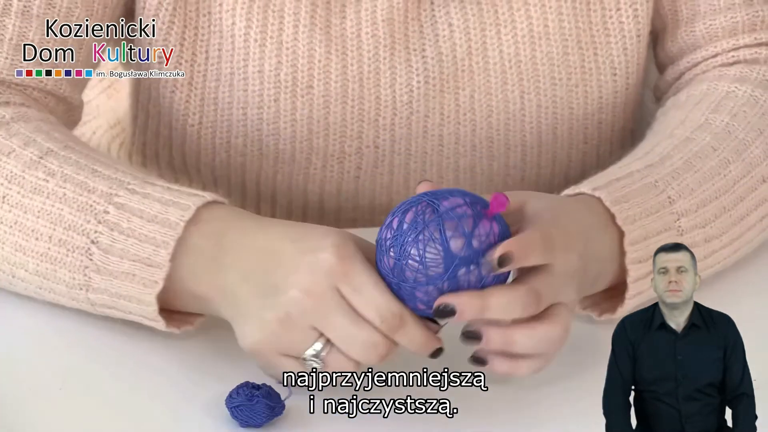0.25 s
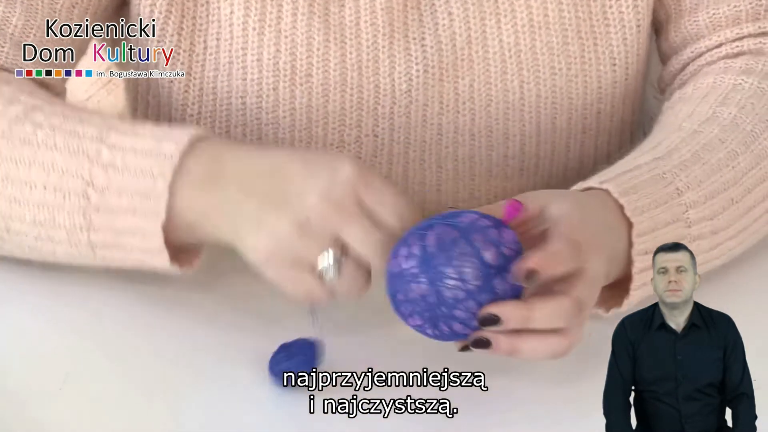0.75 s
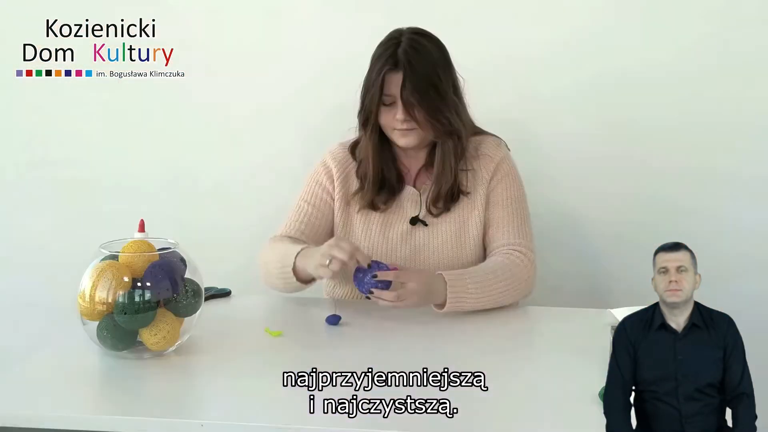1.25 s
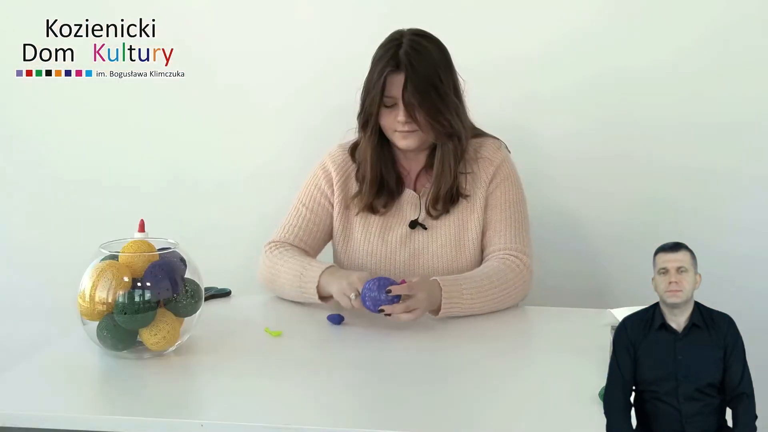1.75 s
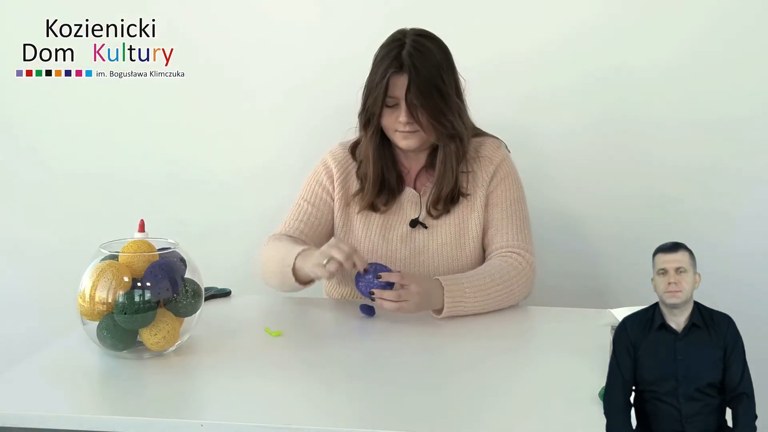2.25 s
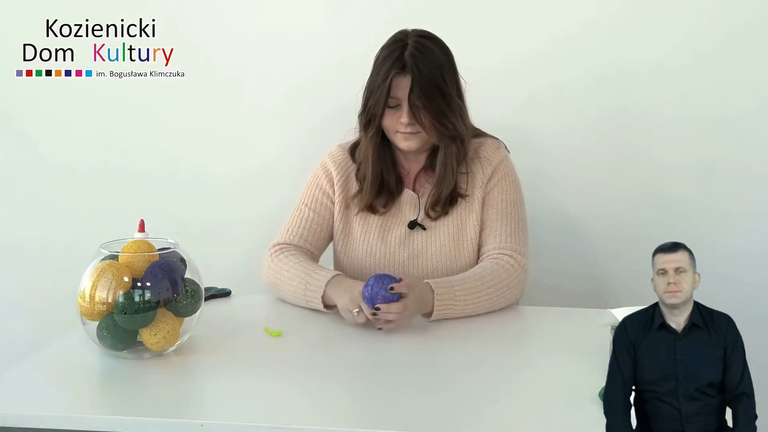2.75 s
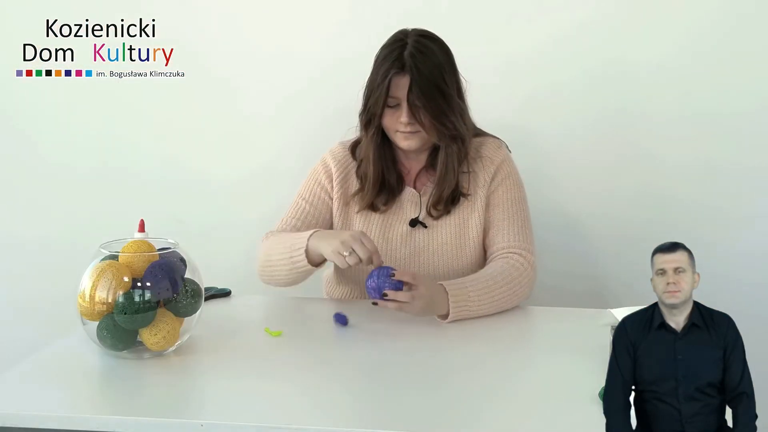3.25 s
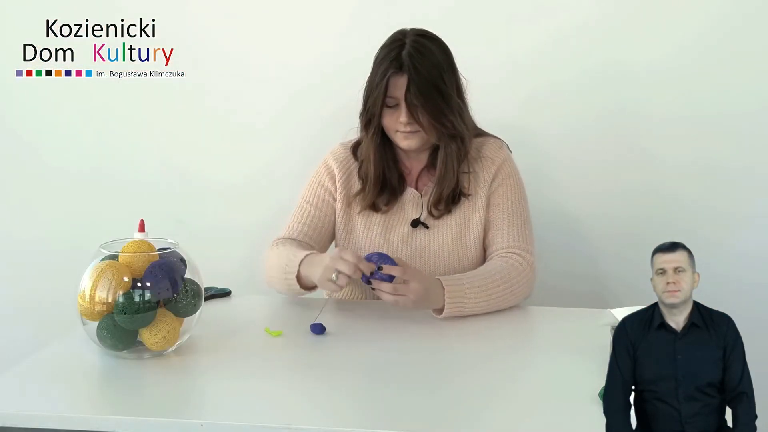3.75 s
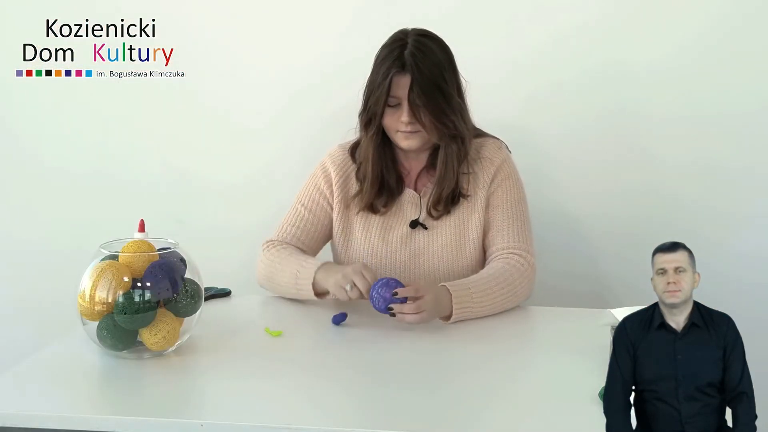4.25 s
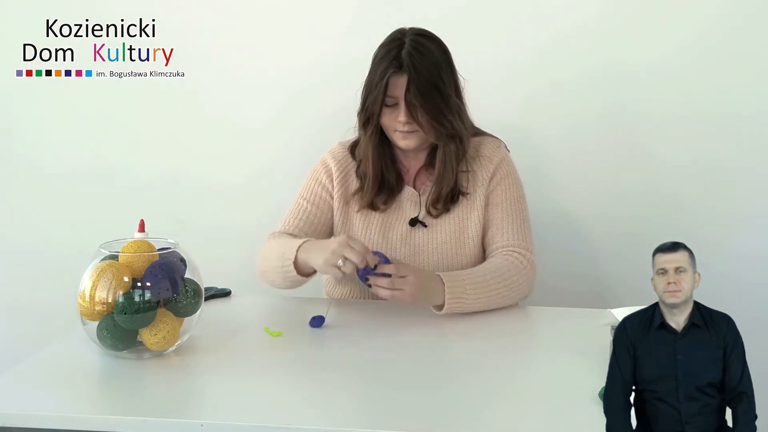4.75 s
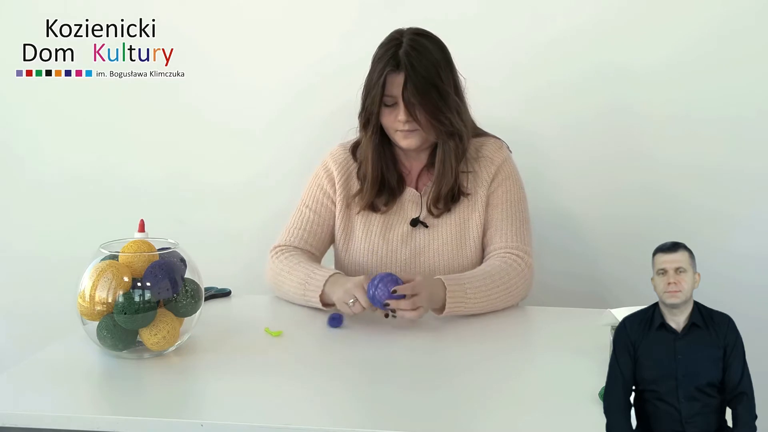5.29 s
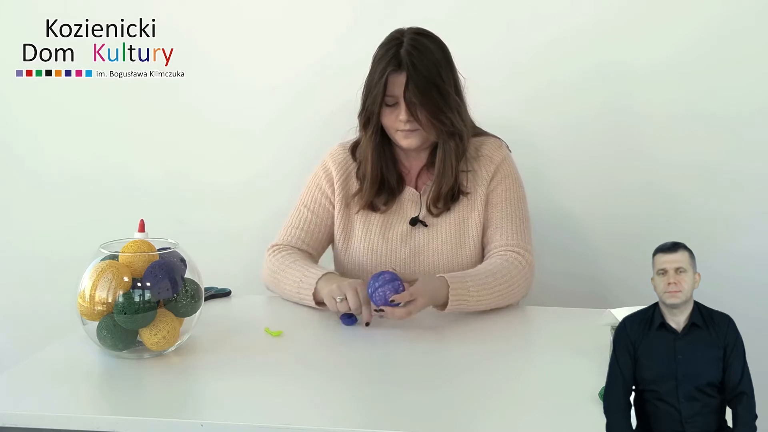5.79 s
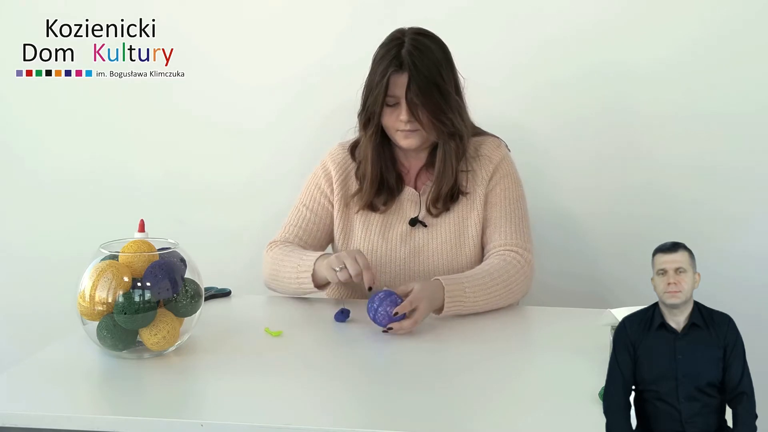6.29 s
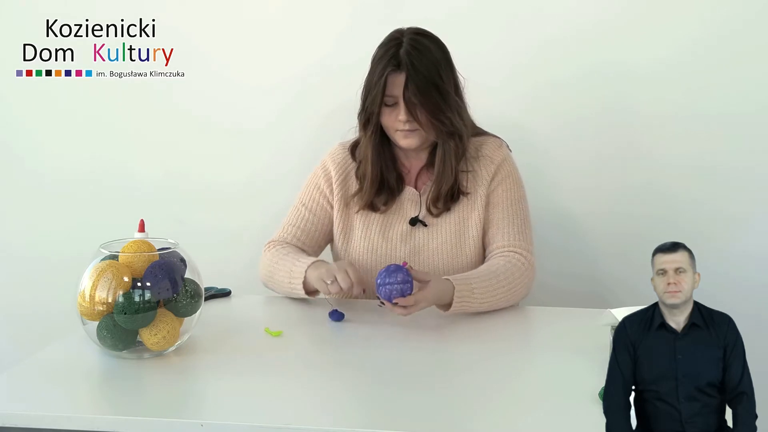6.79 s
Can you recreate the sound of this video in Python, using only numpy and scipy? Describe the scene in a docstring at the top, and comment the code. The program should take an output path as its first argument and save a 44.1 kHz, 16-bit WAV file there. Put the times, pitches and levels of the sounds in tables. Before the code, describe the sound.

Thread being wound by hand round a taut balloon: short uneven scratchy hisses, dull rubber booms and sharp little snaps, close in a quiet room.

```python
"""Quiet room, close clip-on microphone: thread is wound by hand round a small taut balloon.
Uneven strokes of thread and fingertips hiss (noise of moving colour) and fibres tick over the windings.
The rubbed balloon booms and rustles (noise through its resonances); strands slip and snap on the rubber
(crack, ring, falling ripple, thump). A noise suppressor darkens the quiet moments over a faint floor."""
import sys
import numpy as np
from scipy import signal
from scipy.fft import rfft, irfft, next_fast_len
from scipy.io import wavfile
from scipy.ndimage import uniform_filter1d

SR = 44100
rng = np.random.default_rng(int(sys.argv[2]) if len(sys.argv) > 2 else 0)


def file_out(sig):
    """Save sig as 16-bit WAV at sys.argv[1]."""
    # one column per channel
    cols = np.atleast_2d(sig).T
    # limit, then scale
    lim = np.clip(cols, -1, 1)
    pcm = np.round(lim * 32767).astype(np.int16)
    wavfile.write(sys.argv[1], SR, pcm)


N = 310023

# room rumble and hiss, relative spectrum: (frequency [Hz], density [dB per Hz])
ROOM_SPECTRUM = [(20, -3.5), (45, 0), (70, -8.5), (130, -14.5), (300, -21.5), (700, -24.5), (1500, -25),
                 (2800, -29.5), (4000, -35.5), (15000, -34)]
# suppressor shuts a band below this power: (frequency [Hz], density [dB per Hz])
SUPPRESSOR_THRESHOLD = [(150, -108), (400, -108), (620, -100), (1000, -103), (1400, -105), (1700, -102),
                        (2300, -106), (2600, -94), (2950, -86), (3200, -114), (5000, -130), (13500, -128),
                        (15000, -112)]
# balloon resonances in three families: (centre [Hz], half-width at 1/e amplitude [Hz], relative level [dB])
BOOM_MODES = [(207.5, 16, -20), (262.5, 22.8, 4.5), (332.8, 28, -0.5), (381, 48, 0.5), (429.6, 18.3, 1),
              (347, 141, -5)]
LOW_SKIN_MODES = [(734.5, 25, -1.5), (773, 69, -12), (1038, 91, 0), (920, 290, -7)]
HIGH_SKIN_MODES = [(1223, 37.7, -2), (1386, 54, -12.5), (1432, 117, -5), (1622, 55, -17), (1875, 110, -7),
                   (2066, 55, -4.5), (2296, 80, 3), (2396, 150, -8.5), (2780, 630, 2)]
# turns of thread or fresh grips:
# (start [s], skin pitch favoured at first [Hz], time constant of the climb [s])
TURNS_OR_GRIPS = [(0, 797, 0.32), (.4, 1440, 3.0), (.68, 1100, 0.51), (1.148, 590, 0.92), (2.22, 790, 0.87),
                  (3.0, 1163, 0.36), (3.581, 650, 2), (3.8, 1390, 2.7), (4.62, 1510, 3.0),
                  (5.15, 1240, 1.3), (5.36, 1110, 0.51), (6.599, 1420, 1.4)]
# pulls pressing the thread into the balloon: (tightest moment [s], tightening [s], slackening [s],
# boom level [dB], low skin level [dB])
THREAD_PULLS = [(0.048, 0.18, 0.13, -54, -68), (0.14, 0.07, 0.21, -56.5, -66),
                (0.384, 0.025, 0.29, -69, -84), (0.634, 0.02, 0.07, -60, -65),
                (0.715, 0.043, 0.19, -51.5, -52), (0.89, 0.084, 0.11, -63, -78),
                (1.167, 0.042, 0.202, -51.5, -75), (1.364, 0.13, 0.14, -37, -51.5),
                (1.45, 0.072, 0.2, -50.5, -47), (1.635, 0.052, 0.106, -53.5, -50.5),
                (1.792, 0.025, 0.079, -52, -52), (1.89, 0.11, 0.11, -52, -67.5),
                (2.314, 0.16, 0.4, -41.5, -59), (2.494, 0.29, 0.26, -69.5, -61),
                (2.692, 0.056, 0.12, -61, -53), (3.123, 0.12, 0.095, -64.5, -63.5),
                (3.487, 0.14, 0.059, -52, -86.5), (3.69, 0.11, 0.34, -45, -61.5),
                (3.841, 0.081, 0.22, -55, -56.5), (4.21, 0.14, 0.072, -59.5, -70),
                (4.33, 0.21, 0.23, -58.5, -79), (4.697, 0.06, 0.37, -47.5, -59),
                (4.92, 0.13, 0.26, -49, -62), (5.05, 0.038, 0.08, -67, -67),
                (5.243, 0.114, 0.16, -61.5, -59.5), (5.391, 0.031, 0.2, -48, -50),
                (6.026, 0.044, 0.073, -73, -77.5)]
# strokes of thread or fingertip over the windings: (start [s], length [s], hiss level before trim [dB],
# brightness before tilt, low for skin and high for thread [dB per octave], zip pitch [Hz],
# zip prominence [dB], high skin rustle before trim [dB])
WINDING_STROKES = [(0.007, 0.09, -54.5, -9, 5070, 2.5, -61), (0.115, 0.077, -39, 1, 5100, 3, -55),
                   (0.217, 0.1, -46, -1.5, 9330, 1.5, -63.5), (0.427, 0.051, -37, 2, 5650, 4.5, -63),
                   (0.545, 0.066, -49, -0.5, 8000, 5, -76.5), (0.614, 0.024, -38.5, 0, 4380, 5, -61),
                   (0.708, 0.037, -34.5, -1, 7250, 0.5, -43.5), (0.799, 0.069, -42.5, -4, 7360, 10, -51.5),
                   (0.926, 0.061, -45, -4.5, 6200, -1, -55), (1.007, 0.062, -43.5, -1, 6130, 4.5, -55),
                   (1.151, 0.063, -42, -5, 5570, 9.5, -53), (1.265, 0.098, -45, -3.5, 5000, 9, -58.5),
                   (1.377, 0.14, -45, -4, 4970, 9, -55.5), (1.542, 0.12, -44.5, -3.5, 4660, 5, -54),
                   (1.73, 0.19, -42, -2, 7800, 3.5, -53), (1.967, 0.08, -49, -4, 9400, 4, -54),
                   (2.074, 0.077, -47.5, -1, 9000, 2, -59.5), (2.159, 0.27, -45.5, -7, 6560, 3.5, -54.5),
                   (2.479, 0.095, -45, -8.5, 6240, 4.5, -55.5), (2.592, 0.014, -40.5, -2, 7600, 1.5, -67),
                   (2.667, 0.1, -36.5, 0, 9000, 2, -54), (2.812, 0.037, -51, -3, 7000, 2.5, -64),
                   (2.863, 0.031, -42, 2.5, 7000, -0.5, -67), (2.898, 0.06, -50.5, 0, 7000, 0, -77),
                   (3.032, 0.13, -37, 3, 6550, 2, -53), (3.158, 0.11, -44, -3.5, 7150, 4, -56.5),
                   (3.311, 0.11, -44, 0, 6970, 1.5, -62), (3.43, 0.06, -45.5, -6, 5950, 3.5, -56),
                   (3.601, 0.13, -42.5, -5, 5490, 4, -58.5), (3.776, 0.1, -38, -3.5, 9260, 1, -48),
                   (3.909, 0.048, -40.5, -5.5, 6070, 1, -51.5),
                   (4.012, 0.02, -48.5, -7.5, 9900, 6.5, -53.5), (4.103, 0.13, -44, -11, 6100, 2, -55),
                   (4.311, 0.18, -52, -3.5, 4600, 0.5, -59.5), (4.536, 0.067, -50.5, 3, 8810, 6, -75),
                   (4.633, 0.12, -41.5, -8, 6620, 7, -53), (4.764, 0.112, -44.5, -4.5, 9600, 3.5, -49),
                   (4.901, 0.08, -40, -7, 9900, 2.5, -50), (4.996, 0.098, -44.5, -0.5, 9730, -1, -52.5),
                   (5.153, 0.014, -46, -1.5, 9000, 3, -56.5), (5.214, 0.091, -37.5, -0.5, 8670, 0.5, -49),
                   (5.379, 0.13, -45, -1.5, 8380, 3, -53.5), (5.519, 0.042, -50.5, -2.5, 8250, 2, -70),
                   (5.597, 0.061, -58, 2, 8200, 3, -76), (5.714, 0.1, -48.5, 3, 7220, 5, -99),
                   (5.953, 0.07, -55, -1, 4880, 11.5, -69.5), (6.065, 0.11, -50, 0, 7850, 3, -63),
                   (6.319, 0.085, -49, 3.5, 7950, 4.5, -67), (6.512, 0.011, -57, 5, 7330, 9, -75),
                   (6.579, 0.037, -53, 6, 7250, 4, -73.5), (6.643, 0.045, -47, 3, 7250, 4, -66),
                   (6.727, 0.035, -55.5, 2.5, 7250, -1, -75), (6.805, 0.12, -56.5, 2.5, 6900, 7, -84),
                   (6.93, 0.072, -56, -7, 6750, 1, -67.5)]
# friction hiss, relative spectrum: (frequency [Hz], density [dB per Hz])
HISS_SPECTRUM = [(1100, -47.5), (1900, -18.5), (2400, -24), (2800, -10.5), (3200, -3.5), (4100, 0),
                 (4800, -4.5), (5800, 0.5), (7600, 1.5), (10200, -1.5), (12000, -6), (14000, -15.5),
                 (14700, -21.5), (15400, -42)]
# loose fibres ticking: (time [s], level against the untrimmed stroke hiss [dB])
FIBRE_LEVELS = [(0, -12.5), (5.25, -21.5), (5.45, -4), (5.75, -11.5), (6.1, 0.5), (6.4, -8), (6.65, -2.5),
                (7.03, -4)]
# strands snapping on the rubber: (time before a fixed lag [s], peak without thump [dB], ring pitch [Hz],
# relative thump level [dB], crack's 60 dB decay [s])
STRAND_SNAPS = [(0.6963, -22, 7600, -80, 0.014), (1.6156, -29, 4070, -64, 0.034),
                (1.6392, -20.5, 7500, -48, 0.0051), (1.7884, -12.5, 7980, -56, 0.02),
                (2.0762, -26.5, 3500, -81, 0.0063), (2.37, -7.5, 7120, -38, 0.012),
                (2.6455, -28, 6780, -53, 0.0083), (3.0207, -38, 7360, -81, 0.027),
                (3.4014, -26.5, 7600, -56, 0.009), (3.4773, -33, 6070, -43, 0.012),
                (4.0925, -3.5, 4300, -44, 0.01), (4.122, -14, 4630, -53.5, 0.0059),
                (5.0455, -21.5, 4180, -51, 0.01), (5.2553, -23, 7920, -63, 0.019),
                (5.3853, -9.5, 7940, -48, 0.0088), (5.3924, -18, 8000, -44.5, 0.011),
                (5.4138, -24.5, 4440, -44, 0.02), (5.4403, -22.5, 5500, -48, 0.013),
                (5.4813, -24.5, 8370, -48.5, 0.029), (5.6228, -39, 8200, -68, 0.017),
                (6.0075, -25.5, 6220, -67.5, 0.012), (6.0257, -23.5, 6070, -78, 0.03),
                (6.0624, -24.5, 3470, -72, 0.0065), (6.07, -26.5, 3310, -84, 0.019),
                (6.125, -35, 7870, -104, 0.011), (6.3046, -44, 8200, -97, 0.017),
                (6.3671, -22.5, 8310, -97, 0.034), (6.575, -39, 7320, -80.5, 0.011),
                (6.6922, -39, 5720, -98.5, 0.029), (6.718, -37, 4400, -90, 0.011),
                (6.7563, -39, 3400, -86, 0.042), (6.8334, -39, 6700, -97.5, 0.016)]
# broadband part of a snap, relative spectrum: (frequency [Hz], density [dB per Hz])
CRACK_SPECTRUM = [(600, -64.5), (1100, 1.5), (1800, -14), (2800, 1.5), (4200, 8.5), (8000, 7), (11000, 6),
                  (14000, -34.5), (16000, -20.5)]
# whole-balloon thump under a snap, relative spectrum: (frequency [Hz], density [dB per Hz])
THUMP_SPECTRUM = [(60, -52), (130, -26), (200, -14.5), (260, 5.5), (420, 7), (500, -23.5), (600, -31.5),
                  (1500, -70.5)]

EDGE_HZ = 15300
ARCH_DB = 3  # a stroke is strongest in its middle, this much weaker at its ends
STROKE_RISE_DB_PER_S, STROKE_FALL_DB_PER_S = 436, 393
REST_HISS_DB, REST_RUSTLE_DB = -71.5, -91  # the holding hand never lies quite still; before trim
SLACK_DB = -22  # a pull's level at the start of tightening and the end of slackening
# each way of rubbing also drives the other modes a little
STROKE_TO_BOOM_DB, STROKE_TO_LOW_DB, BOOM_TO_HIGH_DB = -22.5, -39.5, -13
SHORT_STRAND_HZ = 2160  # limit of the climb as the free strand shortens
RUSTLE_SHARPNESS = 0.95  # the skin swells and fades more gently than the hiss


def gain_of(db):
    """Decibels to amplitude."""
    return 10 ** (np.asarray(db) / 20)


def evened(x):
    """Scales to rms 1."""
    return x / np.sqrt(np.mean(x ** 2) + 1e-20)


def summed_db(levels):
    """Joint level of unrelated sounds: powers add."""
    return 10 * np.log10(sum(gain_of(db) ** 2 for db in levels) + 1e-20)


def read(points, hz):
    """Interpolates a spectrum on a log-frequency axis."""
    point_hz, value = np.transpose(points)
    return np.interp(np.log(hz + 1), np.log(point_hz + 1), value)


def coloured(x, points):
    """Filters x with a spectrum."""
    hz = np.fft.rfftfreq(len(x), 1 / SR)
    return irfft(rfft(x) * gain_of(read(points, hz)), len(x))


def grid(size):
    """Frame times (a column) and bin frequencies for short-time spectra."""
    hop = size // 4
    return np.arange(N // hop + 2)[:, None] * hop / SR, np.fft.rfftfreq(size, 1 / SR)


def per_sample(t, db):
    """Turns a level at the frame times t into a gain for every sample."""
    return gain_of(np.interp(np.arange(N) / SR, t.ravel(), db.ravel()))


def patches(size, span_s, span_hz):
    """Smooth random field over time and frequency, rms 1."""
    t, hz = grid(size)
    field = rng.standard_normal((len(t), len(hz)))
    for axis, width in enumerate([span_s / t[1, 0], span_hz / hz[1]]):
        length = field.shape[axis]
        blur = np.exp(-(2 * width * np.fft.rfftfreq(length)) ** 2)
        spectrum = rfft(field, axis=axis) * np.expand_dims(blur, 1 - axis)
        field = irfft(spectrum, length, axis=axis)
    return evened(field)


def moving_noise(shape, size):
    """Noise of steady level whose colour follows shape (frames, bins)."""
    shape = shape / np.sqrt((shape ** 2).sum(1, keepdims=True) + 1e-20)
    z = shape * (rng.standard_normal(shape.shape) + 1j * rng.standard_normal(shape.shape))
    return evened(signal.istft(z.T, nperseg=size, noverlap=size * 3 // 4)[1][:N])


def flutter(rate_hz):
    """Random wobble, Gaussian low-pass at rate_hz, rms 1."""
    size = next_fast_len(N)
    low_pass = np.exp(-(np.fft.rfftfreq(size, 1 / SR) / rate_hz) ** 2)
    return evened(irfft(rfft(rng.standard_normal(size)) * low_pass, size)[:N])


def room_floor():
    """Steady rumble and hiss of the room, rms 1."""
    return evened(coloured(rng.standard_normal(N), ROOM_SPECTRUM))


def stroke_shape(t, start, length):
    """A stroke in dB: sets in quickly, arches, stops quickly."""
    u = t - start
    arch = ARCH_DB * (2 * np.clip(u / length, 0, 1) - 1) ** 2
    rise = STROKE_RISE_DB_PER_S * np.maximum(-u, 0)
    fall = STROKE_FALL_DB_PER_S * np.maximum(u - length, 0)
    return -arch - rise - fall


def strokes(t):
    """Hiss dB, rustle dB, brightness, zip Hz, zip dB at times t (a column); louder strokes rule the colour."""
    start, length, hiss_db, brightness, zip_hz, zip_db, rustle_db = np.transpose(WINDING_STROKES)
    shape = stroke_shape(t, start, length)
    power = gain_of(shape + hiss_db) ** 2 + 1e-30
    total = power.sum(1, keepdims=True)
    colour = [power @ column[:, None] / total for column in (brightness, zip_hz, zip_db)]
    hiss = summed_db([*(shape + hiss_db).T, REST_HISS_DB])
    rustle = summed_db([*(RUSTLE_SHARPNESS * shape + rustle_db).T, REST_RUSTLE_DB])
    return hiss, rustle, *colour


def pulls(t):
    """Boom dB and low skin dB at times t (a column): each pull tightens to a peak and slackens."""
    peak, tighten, slacken, boom_db, low_db = np.transpose(THREAD_PULLS)
    shape = SLACK_DB * np.maximum((peak - t) / tighten, (t - peak) / slacken)
    return summed_db((shape + boom_db).T), summed_db((shape + low_db).T)


def skin_pitch(t):
    """Favoured skin pitch [Hz]: restarts at each turn or fresh grip, then climbs as the free strand shortens."""
    start, first_hz, climb_s = np.transpose(TURNS_OR_GRIPS)
    k = np.maximum(np.searchsorted(start, t, "right") - 1, 0)
    remaining = np.exp(-(t - start[k]) / climb_s[k])
    return SHORT_STRAND_HZ * (first_hz[k] / SHORT_STRAND_HZ) ** remaining


def rubbed(modes, pitch_hz, lift_db, span_hz, split_db, reach=0.44):
    """Damped resonances under friction, rms 1; those near pitch_hz are driven hardest."""
    hz = grid(size=2048)[1]
    shape = sum(gain_of(db) * np.exp(-((hz - f) / width) ** 2) for f, width, db in modes)
    favour_db = lift_db * np.exp(-(np.log((hz + 1) / pitch_hz) / reach) ** 2)
    # the shifting grip damps now one resonance, now another
    grip_db = 5 * patches(size=2048, span_s=.07, span_hz=span_hz)
    # the windings split each resonance into close, short-lived lines
    lines_db = split_db * patches(size=2048, span_s=.09, span_hz=14)
    return moving_noise(shape * gain_of(favour_db + grip_db + lines_db), size=2048)


def balloon(boom_db=0, low_db=0, high_db=-1, light_hz=370, hard_hz=260, grain_db=0.5, lump_db=2.0):
    """Booms under the pulls, rustles under the strokes; harder pulls favour deeper boom modes."""
    frames, t = grid(size=2048)[0], grid(size=512)[0]
    depth_hz = np.interp(pulls(frames)[0][:, None], [-54, -43], [light_hz, hard_hz])
    skin_hz = skin_pitch(frames)
    rustle = strokes(t)[1]
    pull_boom, pull_low = pulls(t)
    boom = per_sample(t, boom_db + summed_db([pull_boom, rustle + STROKE_TO_BOOM_DB]))
    low = per_sample(t, low_db + summed_db([pull_low, rustle + STROKE_TO_LOW_DB]))
    high = per_sample(t, high_db + summed_db([rustle, pull_boom + BOOM_TO_HIGH_DB]))
    low_skin = low * rubbed(LOW_SKIN_MODES, skin_hz, lift_db=23.5, span_hz=140, split_db=8.0)
    high_skin = high * rubbed(HIGH_SKIN_MODES, skin_hz, lift_db=18.5, span_hz=174, split_db=2.5)
    body = boom * rubbed(BOOM_MODES, depth_hz, lift_db=10.5, span_hz=89, split_db=3.0)
    # the thread moves in small jerks, with a finer grain on top
    jerks_db = lump_db * flutter(rate_hz=33) + grain_db * flutter(rate_hz=60)
    return body + (low_skin + high_skin) * gain_of(jerks_db)


def crackle(per_s=260, spread_db=4.5):
    """Single fibres tick at random as the thread passes: bursts falling 60 dB in 5 ms."""
    sizes = gain_of(spread_db * np.minimum(rng.exponential(1, N), 4)) * (rng.random(N) < per_s / SR)
    kind = rng.integers(0, 8, N)
    t = np.arange(200) / SR
    shapes = rng.standard_normal((8, len(t))) * gain_of(-60 * t / .005)
    ticks = sum(signal.oaconvolve(sizes * (kind == k), shape)[:N] for k, shape in enumerate(shapes))
    frames = grid(size=512)[0]
    fibre_s, fibre_db = np.transpose(FIBRE_LEVELS)
    level_db = strokes(frames)[0] + np.interp(frames.ravel(), fibre_s, fibre_db)
    return evened(coloured(ticks, HISS_SPECTRUM)) * per_sample(frames, level_db)


def snaps(level_db=0, crack_db=-7, spike_db=2, ripple_db=-16, thump_db=4, ring_share=0.48,
          lag_s=0.00093, crack_reach=2.38):
    """A strand lets go: a crack, a brief ring, a falling ripple over the skin and a soft thump."""
    out, pushes, t = np.zeros(N + SR), np.zeros(N), np.arange(4096) / SR
    # short ripples cross the rubber faster than long ones, so the pitch falls
    ripple_hz = 1100 + 6500 * np.exp(-t / .0036)
    chirp = np.sin(2 * np.pi * np.cumsum(ripple_hz) / SR)
    chirp = chirp * gain_of(-60 * t / 0.027) * (1 - np.exp(-t / 0.0015))
    high_pass = signal.butter(4, 1000, "high", fs=SR, output="sos")
    for s, peak_db, ring_hz, push_db, t60 in STRAND_SNAPS:
        fade_db = -60 * t / max(t60, .002)
        burst, scatter = rng.standard_normal((2, len(t)))
        crack_gain = gain_of(crack_db + fade_db) + gain_of(spike_db) * np.exp(-t / 0.00012)
        crack = evened(coloured(burst, CRACK_SPECTRUM)) * crack_gain
        # a slacker strand cracks duller
        cutoff_hz = min(crack_reach * ring_hz, SR / 2 - 1000)
        crack = signal.sosfilt(signal.butter(2, cutoff_hz, fs=SR, output="sos"), crack)
        ring = np.sin(2 * np.pi * ring_hz * t) * gain_of(fade_db / ring_share)
        # the windings scatter the ripple
        ripple = gain_of(ripple_db) * chirp * evened(uniform_filter1d(scatter, size=28))
        snap = (crack + ring + ripple) * (1 - np.exp(-t / 0.000094))
        snap = signal.sosfilt(high_pass, snap)
        start = round((s + lag_s) * SR)
        out[start:start + len(t)] += gain_of(peak_db + level_db) * snap / abs(snap).max()
        pushes[start] = gain_of(push_db + thump_db)
    thumps = coloured(pushes, THUMP_SPECTRUM)
    return out[:N] + thumps * pushes.max() / abs(thumps).max()


def sliding(level_db=-1.0, patchy_db=2.5, skin_patchy=0.15, tilt=0.92, zip_width=0.17, judder_db=2.21):
    """Countless fibres catch and let go: a hiss with a moving zip, juddering with the fingers."""
    t, hz = grid(size=512)
    stroke_db, _, brightness, zip_hz, prominence_db = strokes(t)
    octaves = np.clip(np.log2((hz + 1) / 7000), -.45, .75)
    zip_db = prominence_db * np.exp(-(np.log((hz + 1) / zip_hz) / zip_width) ** 2)
    colour_db = read(HISS_SPECTRUM, hz) + tilt * (brightness + 1.2) * octaves + zip_db
    # dull rubbing by skin is more resonant than the bright hiss of thread
    bands_db = (patchy_db - skin_patchy * brightness) * patches(size=512, span_s=.06, span_hz=235.4)
    hiss = moving_noise(gain_of(colour_db + bands_db), size=512)
    return hiss * per_sample(t, stroke_db) * gain_of(level_db + judder_db * flutter(rate_hz=35))


def suppressor(x, depth_db=-24):
    """Turns every band down towards depth_db as its smoothed power falls under the threshold."""
    hz, _, z = signal.stft(x, SR, nperseg=1024, noverlap=768, scaling="psd")
    power = uniform_filter1d(2 * abs(z) ** 2, size=5, axis=1)  # over time
    power = uniform_filter1d(power, size=3, axis=0)  # over frequency
    threshold = gain_of(read(SUPPRESSOR_THRESHOLD, hz))[:, None] ** 2
    excess = (power / threshold) ** 2
    z = z * (excess + gain_of(depth_db)) / (excess + 1)
    return signal.istft(z, SR, nperseg=1024, noverlap=768, scaling="psd")[1][:N]


def scene():
    """One microphone hears everything, the same in both channels."""
    return np.tile(balloon() + crackle() + snaps() + sliding(), (2, 1))


def record(dry, floor_db=-86, side_db=-17, width_db=-33):
    """Noise suppression, a trace of width, a faint floor, then the band limit."""
    cleaned = suppressor(dry.mean(0))
    scatter = rng.standard_normal(1024)
    scatter = scatter / np.linalg.norm(scatter)
    width = gain_of(width_db) * signal.oaconvolve(cleaned, scatter)[:N]
    floor = gain_of(floor_db) * room_floor()
    side = width + gain_of(floor_db + side_db) * room_floor()
    out = cleaned + floor + np.array([side, -side])
    low_pass = signal.firwin(511, EDGE_HZ, window=("kaiser", 9), fs=SR)
    return signal.oaconvolve(out, low_pass[None], "same")


dry = scene()
out = record(dry)
file_out(out)
```